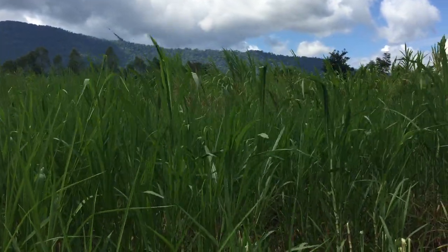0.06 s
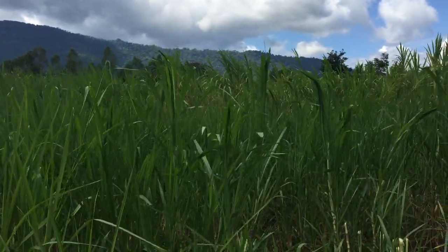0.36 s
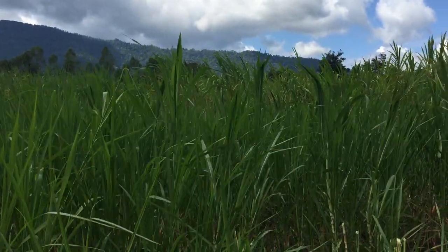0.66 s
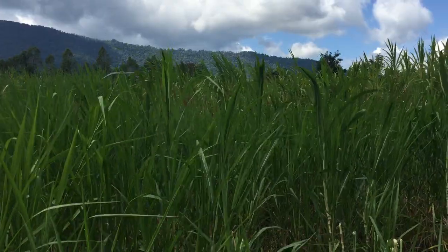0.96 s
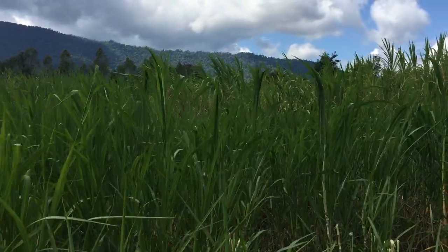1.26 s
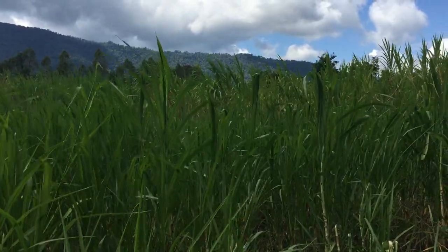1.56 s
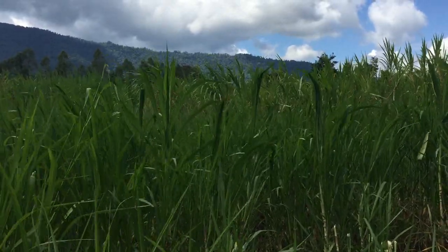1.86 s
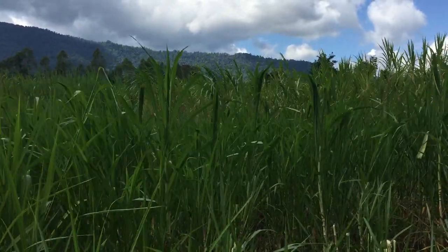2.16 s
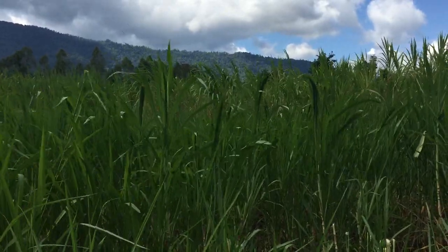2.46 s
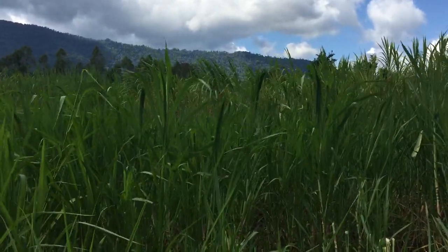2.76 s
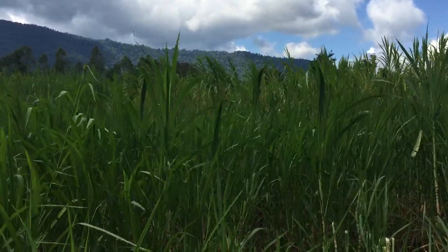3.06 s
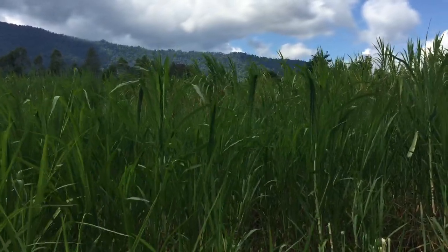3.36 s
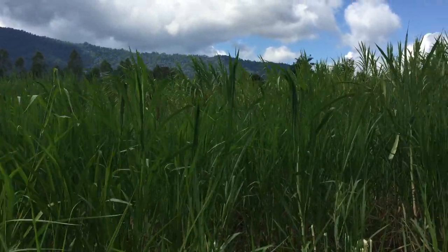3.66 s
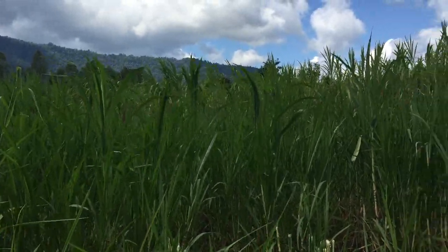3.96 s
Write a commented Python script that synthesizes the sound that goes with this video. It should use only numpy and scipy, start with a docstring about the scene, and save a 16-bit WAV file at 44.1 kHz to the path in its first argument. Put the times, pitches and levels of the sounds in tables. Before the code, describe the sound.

Wind buffets the microphone in a field of tall grass, its low rumble and short thumps coming in brief gusts, then stronger and steadier. The grass hisses softly and a stalk snaps, with faint insects and birds behind.

```python
"""Tall grass hisses in the wind over a low rumble. The blades brush in a fine fizz and now and then a stalk
ticks, while gusts buffet the microphone: turbulence rumbles and single eddies land as short thumps.
Behind it, insects trill near 7 kHz, a small bird gives runs of thin falling chirps, a far bird hoots
faintly, and countless distant calls blend into a soft chatter."""
import sys
import numpy as np
from scipy import signal
from scipy.fft import rfft, irfft, next_fast_len
from scipy.io import wavfile
from scipy.ndimage import uniform_filter1d, map_coordinates

SR = 44100
rng = np.random.default_rng(int(sys.argv[2]) if len(sys.argv) > 2 else 0)


def store_wav(level_fs):
    """Save 16-bit WAV to argv[1]."""
    pcm = np.round(np.clip(np.atleast_2d(level_fs), -1, 1) * 32767)
    wavfile.write(sys.argv[1], SR, pcm.T.astype(np.int16))


N = 176400

# Tone of the far wind (frequency [Hz], relative density [dB])
FAR_WIND_EQ = [(25, -6), (100, -2.5), (300, -10), (500, -5), (800, -4.5), (1200, -9.5), (2500, -25)]
# Fader of the distant bird chatter (time [s], level [dB])
CHATTER_FADER = [(0, -63.5), (.8, -64.5), (1.3, -62.5), (2.1, -63), (2.6, -66.5), (3.15, -63), (3.5, -71),
                 (4, -70)]
# Far bird's hoots (mid-note time [s], level [dB], pitch [Hz], half-length [s])
HOOT_CUES = [(.26, -64, 1160, .035), (.45, -67, 1142, .04), (.64, -67, 1125, .045), (.83, -68, 1118, .045),
             (1.05, -68, 1112, .045), (1.27, -66, 1105, .055), (1.475, -67, 1230, .02),
             (1.625, -66, 1225, .02), (1.9, -66, 1230, .02), (1.99, -66, 1170, .02), (2.3, -67, 1105, .035)]
# Fader of the insects (time [s], level [dB])
TRILL_FADER = [(0, -60), (.6, -59.5), (.8, -63), (.95, -66.5), (1.25, -65), (1.55, -62), (2.15, -59),
               (2.5, -62), (2.8, -63), (3.3, -61.5), (4, -64)]
# Tone of the insects (frequency [Hz], relative density [dB])
TRILL_EQ = [(6000, -72), (6550, -19), (6850, -8), (7060, -1), (7200, 1), (7300, -8), (7420, -41)]
# Pulsing of the insects (rate [Hz], depth [fraction])
TRILL_TREMOLO = [(17.4, 0.11), (87, 0.076)]
# Small bird's chirps (mid-chirp time [s], level [dB])
CHIRP_CUES = [(.527, -59), (.586, -57), (.647, -57), (.711, -54.5), (1.565, -57.5), (1.621, -55.5),
              (1.682, -55), (1.744, -56.5), (1.808, -55), (2.828, -54.5), (2.89, -55.5), (2.951, -55),
              (3.941, -60.5), (3.996, -56)]
# Group fader of the grass, ahead of the hiss and fizz trims (time [s], level [dB])
GRASS_FADER = [(0, -56.5), (.4, -58.5), (.85, -60), (1.25, -58), (1.65, -59), (2.05, -58.5), (2.45, -61.5),
               (2.7, -58), (2.95, -60), (3.1, -57.5), (3.25, -61), (3.6, -60.5), (4, -62)]
# Tone of the whole field's hiss (frequency [Hz], relative density [dB])
HISS_EQ = [(600, -34), (850, -9.5), (1050, -2), (1350, -5.5), (2050, -4), (2500, -4), (3150, -1.5),
           (4400, -2), (4900, -5.5), (5400, -3), (6400, -4), (7500, -9), (9100, -6), (9900, -7),
           (10400, -11.5), (11500, -7), (13000, -10), (15600, -11.5)]
# Tone of near blades brushing (frequency [Hz], gain [dB])
FIZZ_EQ = [(2500, -40), (4000, -4), (5000, -12), (6000, 1.5), (7700, 8), (9000, 4.5), (10400, -3),
           (11800, -2), (13500, 5), (15500, -7)]
# Stalks snapping together (time [s], peak level [dB], centre [Hz], half-width [octaves])
TICK_CUES = [(1.3848, -41, 8800, .2), (2.7369, -24.5, 7000, 1.05), (3.1062, -35, 12600, .2)]
# Strength of the gusts on the microphone (time [s], level [dB])
GUST_FADER = [(0, -58), (.11, -54), (.21, -63.5), (.32, -76.5), (.58, -72), (.65, -37.5), (.8, -54),
              (.9, -54), (1.14, -51.5), (1.33, -50), (1.5, -36.5), (1.63, -51.5), (1.78, -37.5),
              (1.98, -49.5), (2.15, -57), (2.35, -39.5), (2.55, -32.5), (2.87, -43.5), (3.02, -42),
              (3.2, -33.5), (3.5, -35.5), (3.7, -35.5), (3.87, -37), (4, -33)]
# Tone of the turbulence (frequency [Hz], relative density [dB])
RUMBLE_EQ = [(20, -41), (35, -5.5), (55, 3.5), (90, 1.5), (140, -10.5), (220, -19), (350, -37), (600, -41),
             (1000, -53), (2000, -120)]
# Eddies hitting the microphone (time [s], level [dB], half-length [s], 40 dB roll-off point [Hz])
EDDY_CUES = [(0.644, -35.5, 0.0065, 552), (.674, -20.5, 0.0063, 875), (0.789, -38, 0.0046, 187),
             (1.104, -34.5, .01, 538), (1.134, -37, 0.011, 247), (1.25, -44, .01, 216),
             (1.455, -32.5, 0.0057, 520), (1.483, -29, 0.006, 214), (1.736, -36, 0.012, 454),
             (1.825, -36, 0.03, 231), (2.009, -42.5, 0.011, 400), (2.112, -40, 0.0082, 174),
             (2.195, -24, 0.0086, 448), (2.238, -25, 0.0079, 260), (2.303, -32.5, .014, 255),
             (2.401, -25, 0.013, 633), (2.478, -26.5, 0.014, 696), (2.535, -31, 0.03, 241),
             (2.576, -21.5, 0.011, 608), (2.609, -20, 0.0057, 618), (2.683, -27.5, .012, 417),
             (2.746, -35.5, 0.02, 1102), (2.808, -28, .017, 475), (2.932, -27, 0.021, 654),
             (3.066, -39, 0.018, 654), (3.152, -32, 0.024, 399), (3.248, -20, 0.0093, 771),
             (3.322, -26.5, 0.0095, 1106), (3.369, -30.5, 0.011, 543), (3.41, -30.5, 0.024, 590),
             (3.562, -21.5, 0.0073, 420), (3.647, -31.5, 0.01, 330), (3.66, -23.5, 0.0059, 950),
             (3.709, -27.5, 0.0035, 1200), (3.777, -25.5, 0.011, 378), (3.801, -34, 0.011, 617),
             (3.855, -20.5, 0.0085, 464), (3.888, -25.5, 0.015, 565), (3.941, -27.5, 0.0088, 422)]
# Bands of a thump ahead of its roll-off (centre [Hz], gain [dB])
THUMP_BANDS = [(55, -8), (90, -1), (150, -1), (260, -2), (430, -2), (620, 0.5)]


def amp(db):
    """Decibels to gain."""
    return 10 ** (np.asarray(db) / 20)


def unit(x):
    """x at rms 1."""
    return x / np.sqrt(np.mean(x ** 2) + 1e-20)


def eq_gain(eq, hz):
    """Gain of an EQ curve, drawn on a log frequency axis."""
    points_hz, db = np.transpose(eq)
    return amp(np.interp(np.log(hz + 1), np.log(points_hz + 1), db))


def clock():
    """The time of each sample."""
    return np.arange(N) / SR


def ride(fader):
    """A fader's level in dB at each sample."""
    return np.interp(clock(), *np.transpose(fader))


def wobble(rate):
    """A smooth random curve, rate knots a second."""
    return map_coordinates(rng.standard_normal(int(N * rate / SR) + 4), [clock() * rate])


def filtered(x, response):
    """x through a zero-phase filter whose gain is response(hz)."""
    size = next_fast_len(len(x) + 8192)
    return irfft(rfft(x, size) * response(np.fft.rfftfreq(size, 1 / SR)), size)[:len(x)]


def noise(eq):
    """Coloured noise of rms 1."""
    return unit(filtered(rng.standard_normal(N), lambda hz: eq_gain(eq, hz)))


def patchy(x, depth_db):
    """x with brief random patches of gain in time and pitch."""
    spectra = signal.stft(x, nperseg=512)[2]
    patches = uniform_filter1d(rng.standard_normal(spectra.shape), size=6, axis=0)
    patches = uniform_filter1d(patches, size=7, axis=1)
    return signal.istft(spectra * amp(depth_db * unit(patches)), nperseg=512)[1][:N]


def whistle(time, db, pitch_hz, half_s, fall_hz_per_s, blur):
    """A falling note, blurred in level and phase by its way over the field."""
    out, offset = np.zeros(N), clock() - time
    near = np.abs(offset) < 3 * half_s
    t = offset[near]
    swell = np.exp(-np.abs(t / half_s) ** 3)
    tone = np.exp(2j * np.pi * (pitch_hz * t - fall_hz_per_s * t * t / 2))
    out[near] = amp(db) * np.sqrt(2) * swell * np.real(blur[near] * tone)
    return out


def far_wind(level_db=-68.5):
    """Distant wind lays a steady, dark bed."""
    return amp(level_db) * noise(FAR_WIND_EQ)


def far_chatter(calls_per_s=170, centre_hz=2189, spread_octaves=.55, half_s=.0093, glide_hz_per_s=2200):
    """Countless far calls blend into a faint chatter of short gliding notes."""
    out, t = np.zeros(N + SR), np.arange(-SR // 20, SR // 20) / SR
    count = int(calls_per_s * N / SR)
    for k, (jitter, pitch, strength, glide, span) in enumerate(rng.standard_normal((count, 5))):
        start = int((k + 2 * jitter) / count * N) % N
        hz = np.clip(centre_hz * 2 ** (spread_octaves * pitch), 950, 6000)
        swell = np.exp(-(t / (half_s * np.exp(.3 * span))) ** 2)
        tone = np.sin(2 * np.pi * (hz + glide_hz_per_s * glide * t / 2) * t)
        out[start:][:len(t)] += amp(.5 * np.tanh(strength)) * swell * tone
    return amp(ride(CHATTER_FADER)) * unit(out[len(t) // 2:][:N])


def far_hoots(fall_hz_per_s=270, roughness=.3):
    """A far bird gives a slow series of wavering hoots, each sagging in pitch."""
    blur = 1 + roughness * (wobble(50.96) + 1j * wobble(49.9))
    return sum(whistle(time, db, hz, half_s, fall_hz_per_s, blur) for time, db, hz, half_s in HOOT_CUES)


def insects():
    """Many far insects blend into one narrow, faintly pulsing band."""
    tremolos = [1 + depth * np.sin(2 * np.pi * rate * clock() + wobble(2.08))
                for rate, depth in TRILL_TREMOLO]
    return amp(ride(TRILL_FADER)) * unit(noise(TRILL_EQ) * np.prod(tremolos, axis=0))


def small_bird(pitch_hz=6780, half_s=.014, fall_hz_per_s=25000, roughness=.33):
    """A small bird whistles runs of thin, steeply falling chirps."""
    blur = 1 + roughness * (wobble(300) + 1j * wobble(340))
    return sum(whistle(time, db, pitch_hz, half_s, fall_hz_per_s, blur) for time, db in CHIRP_CUES)


def grass(hiss_trim_db=2, low_cut_hz=850, fizz_trim_db=-9, grains_per_s=1800):
    """The whole field hisses; nearer blades brush in patches of dense tiny grains."""
    level_db = ride(GRASS_FADER) + 1.04 * wobble(12)
    hiss = patchy(noise(HISS_EQ), depth_db=1.2)
    hiss = unit(filtered(hiss, lambda hz: 1 / (1 + (low_cut_hz / (hz + 1)) ** 6)))
    grains = (rng.random(N) < grains_per_s / SR) * rng.standard_normal(N)
    grains *= amp(5 * np.minimum(rng.exponential(size=N), 4))  # a few stand out, by up to 20 dB
    fizz = unit(filtered(patchy(grains, depth_db=4.5), lambda hz: eq_gain(FIZZ_EQ, hz)))
    fizz *= amp(1.7 * wobble(18))  # quick flutter
    return amp(level_db + hiss_trim_db) * hiss + amp(level_db + fizz_trim_db) * fizz


def stalk_ticks(snap_db=15, decay_s=.0006, tail_db=-24, tail_s=.005):
    """A stalk snaps against another and scrapes for a moment."""
    out, t = np.zeros(N + SR), np.arange(SR // 20) / SR
    envelope = np.exp(-t / decay_s) + amp(tail_db) * np.exp(-t / tail_s)
    for time, db, centre_hz, octaves in TICK_CUES:
        burst = rng.standard_normal(len(t)) * envelope
        burst[0] += amp(snap_db)
        burst = np.roll(burst, 20)  # room for the filter to ring ahead of the snap
        tick = filtered(burst, lambda hz: 1 / (1 + (np.log2((hz + 1) / centre_hz) / octaves) ** 4))
        out[round(time * SR):][:len(t)] += amp(db) * tick / np.abs(tick).max()
    return out[:N]


def gust_rumble(flutter_db=3.2, flutter_per_s=32):
    """Turbulence at the microphone follows the strength of the gust."""
    flow = noise(RUMBLE_EQ)
    power = uniform_filter1d(uniform_filter1d(flow ** 2, size=3000), size=3000)
    levelled = flow / np.sqrt(np.abs(power) + 1e-6)
    return levelled * amp(ride(GUST_FADER) + flutter_db * wobble(flutter_per_s))


def eddy_thumps(band_octaves=.52, high_cut_hz=780):
    """Each eddy is a thump of a few cycles: its bass lasts longest, and sharper ones reach higher."""
    out, t = np.zeros(N + SR), np.arange(-SR // 8, SR // 8) / SR
    centres, band_db = np.transpose(THUMP_BANDS)
    for time, db, half_s, reach_hz in EDDY_CUES:
        gains = amp(band_db - 40 * (centres / reach_hz) ** 1.25)
        for centre, gain in zip(centres, gains / np.linalg.norm(gains)):
            band_s = half_s * (162 / centre) ** .36  # the cue's half-length holds at 162 Hz
            swell = 1 / np.cosh(np.clip(t / band_s, -20, 20)) ** 2
            burst = swell * rng.standard_normal(len(t))
            puff = filtered(burst, lambda hz: np.exp(-(np.log2((hz + 1) / centre) / band_octaves) ** 2))
            puff *= np.sqrt(2 * half_s * SR / np.sum(puff ** 2))  # energy of rms 1 over the cue's length
            out[round(time * SR):][:len(t)] += amp(db) * gain * puff
    return filtered(out[len(t) // 2:][:N], lambda hz: 1 / (1 + (hz / high_cut_hz) ** 16))


def scene():
    """Mono mix: far wind and animals behind, grass and buffeting up front."""
    background = far_wind() + far_chatter() + far_hoots() + insects() + small_bird()
    foreground = grass() + stalk_ticks() + gust_rumble() + eddy_thumps()
    return (background + foreground)[None]


def record(dry):
    """A brick-wall high cut at 15.8 kHz on the whole mix."""
    return np.array([filtered(channel, lambda hz: hz < 15800) for channel in dry])


dry = scene()
out = record(dry)
store_wav(out)
```